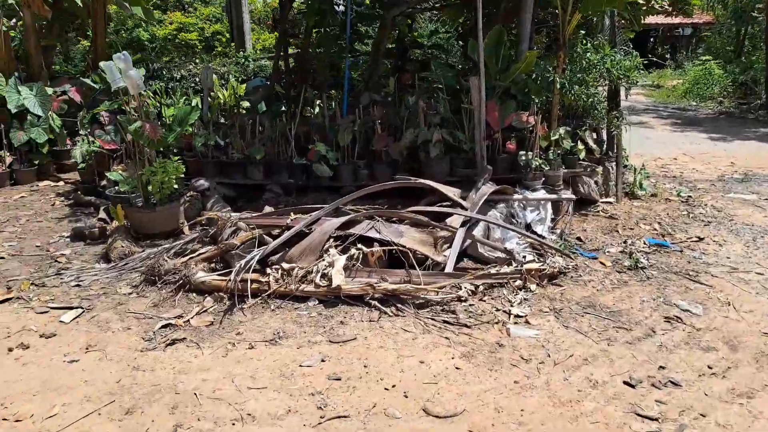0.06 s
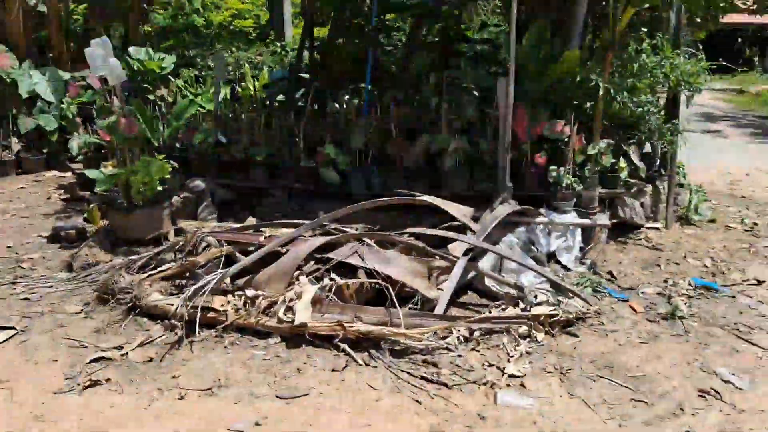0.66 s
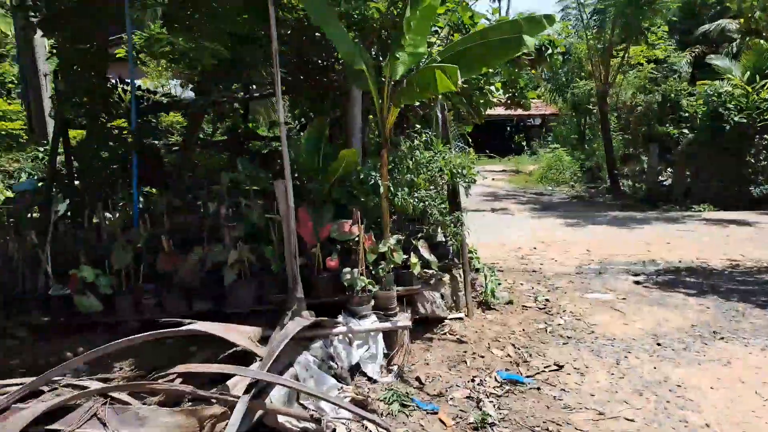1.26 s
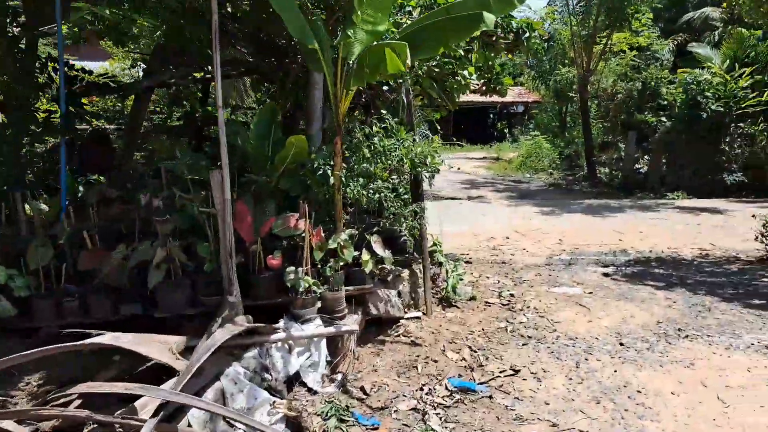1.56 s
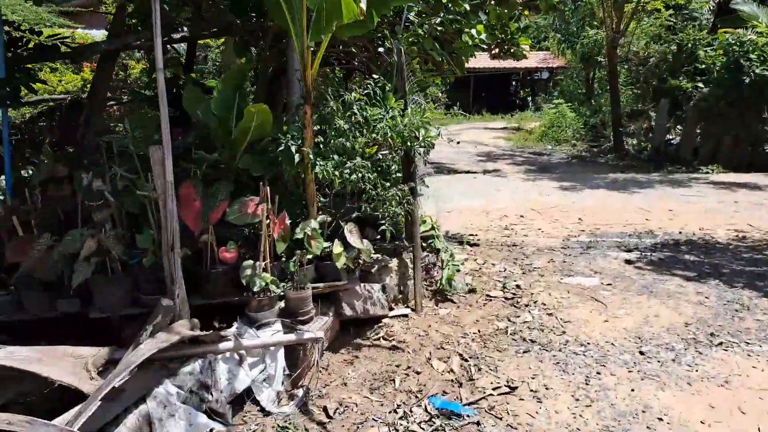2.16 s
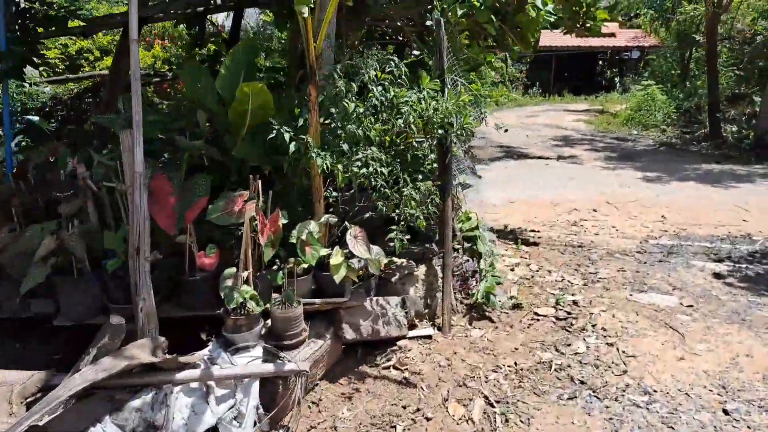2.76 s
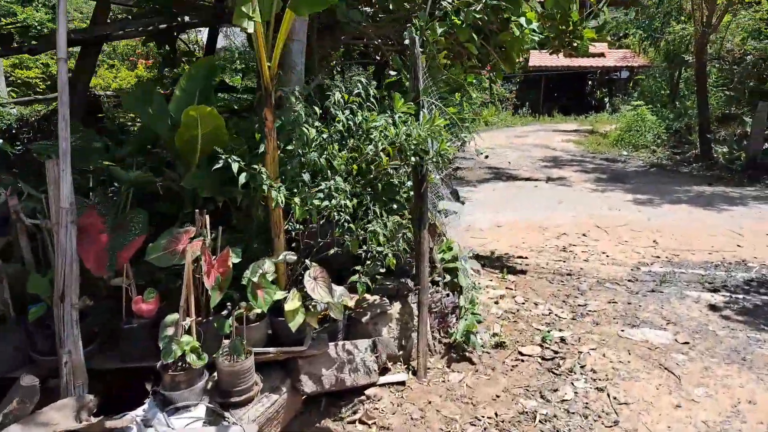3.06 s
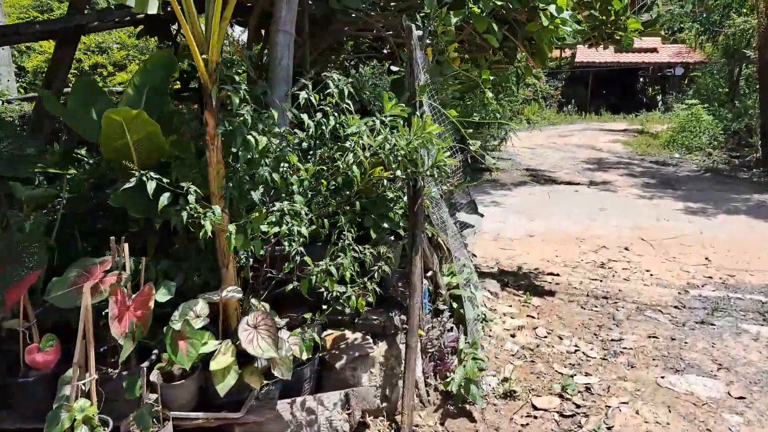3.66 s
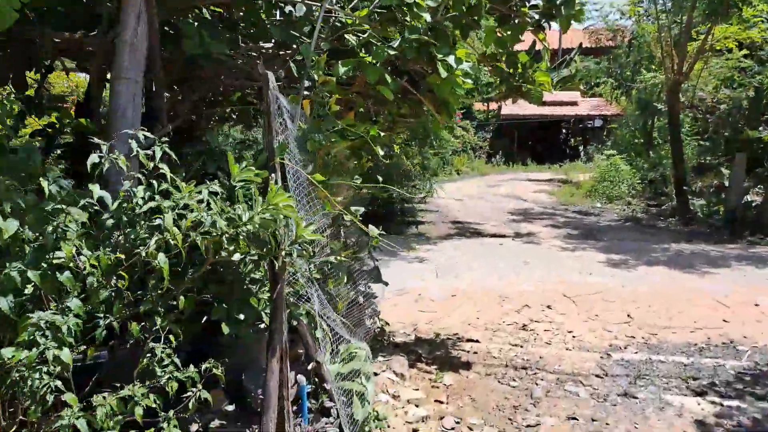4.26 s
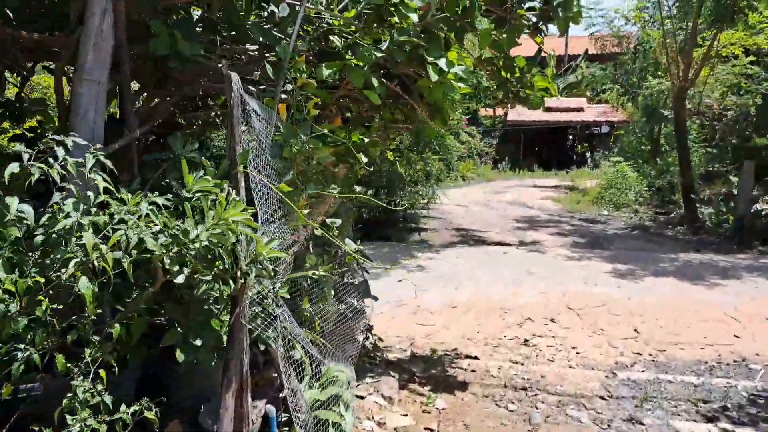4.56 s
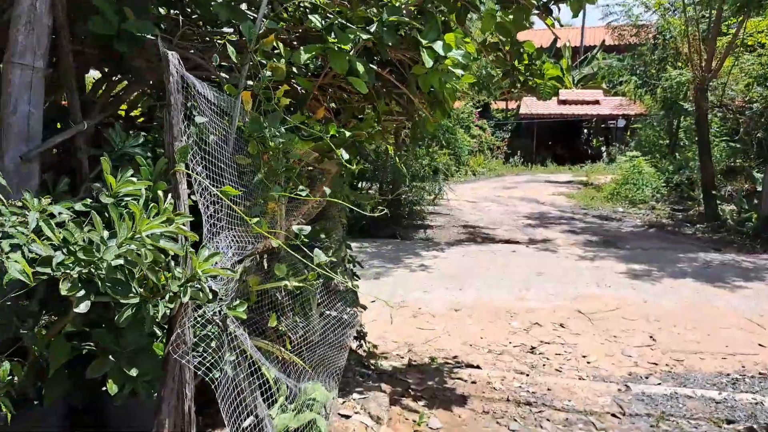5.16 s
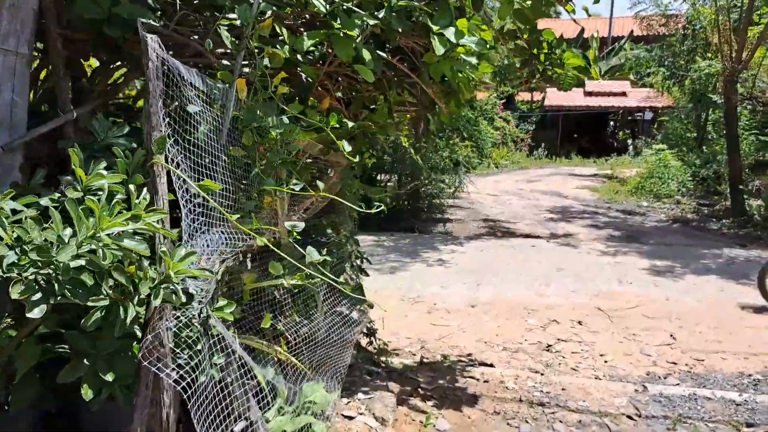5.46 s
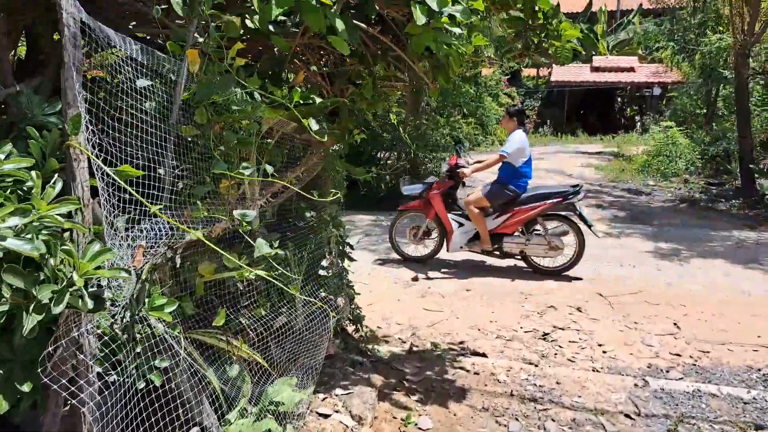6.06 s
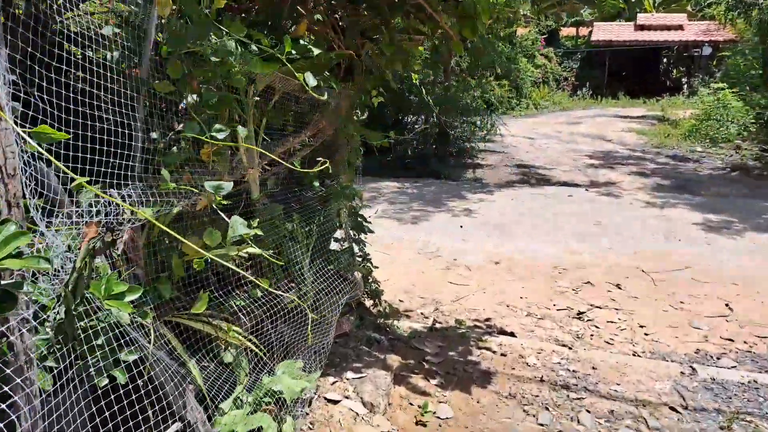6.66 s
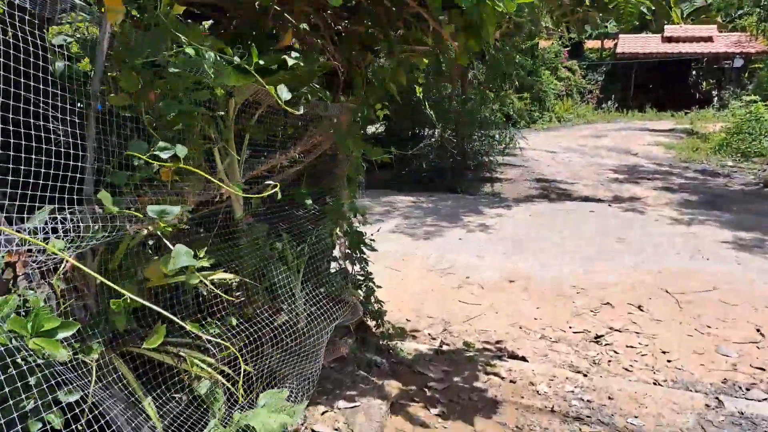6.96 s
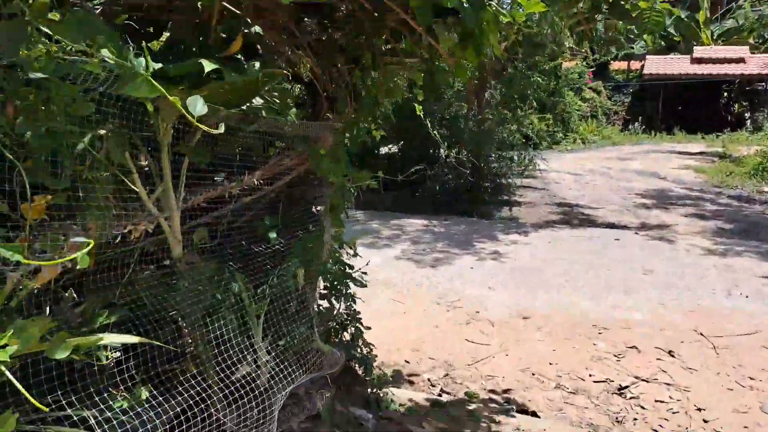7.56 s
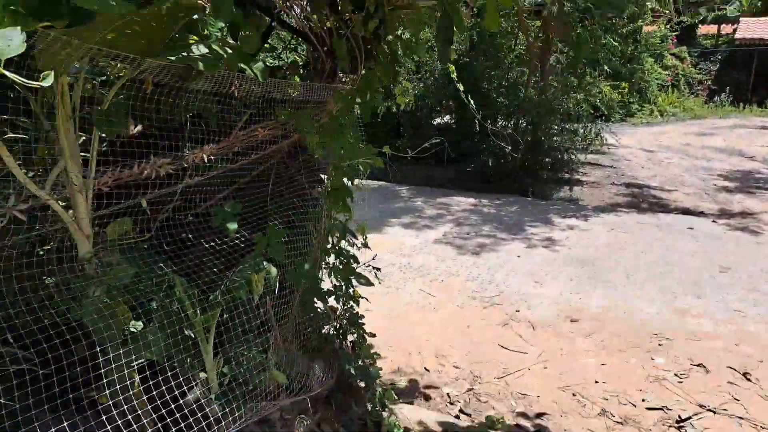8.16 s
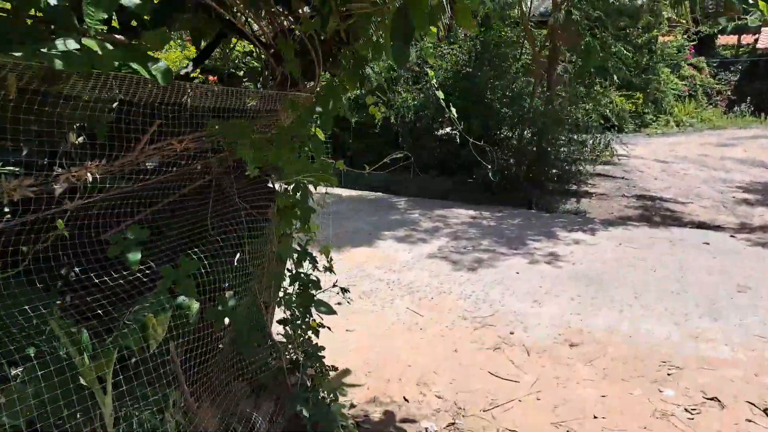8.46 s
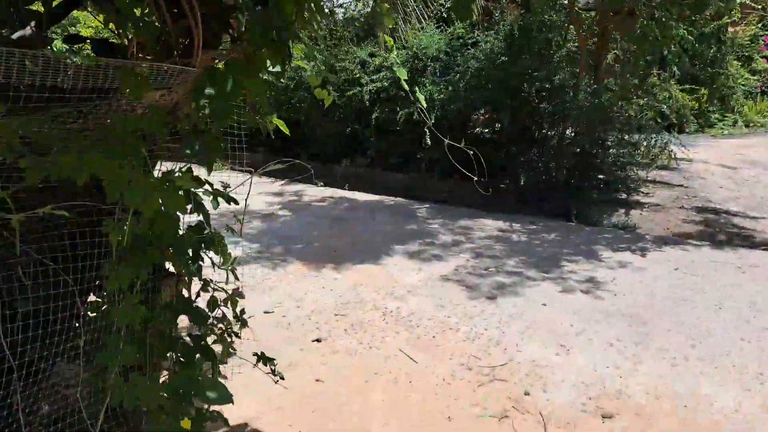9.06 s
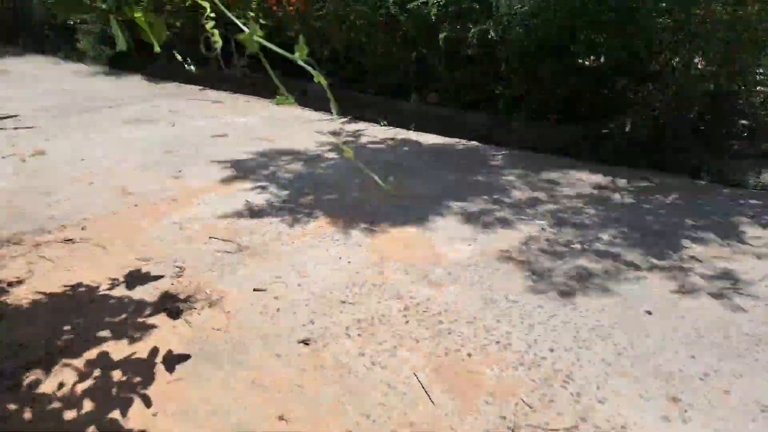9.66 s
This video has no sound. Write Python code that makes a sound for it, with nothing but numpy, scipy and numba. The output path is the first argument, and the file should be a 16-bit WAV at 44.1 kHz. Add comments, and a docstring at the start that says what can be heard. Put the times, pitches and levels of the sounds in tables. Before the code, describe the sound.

A small motorcycle putters closer, passes right to left and drops to idle, while footsteps scuff dry dirt and faint birds call.

```python
"""A small four-stroke motorcycle putters up a village lane, passes right to left, shuts its throttle
and idles on. Each firing rings the silencer, each intake stroke the air box; chain, valves and tyres
rattle and hiss as it comes close. Nearby, someone walks over dry dirt: soles scuff and thud, grit and
dead leaves tick. Faint birds call in the trees over a low breeze."""
import sys
import numpy as np
from scipy import signal
from scipy.fft import rfft, irfft
from scipy.io import wavfile
from scipy.ndimage import uniform_filter1d
from numba import njit

SR = 44100
rng = np.random.default_rng(int(sys.argv[2]) if len(sys.argv) > 2 else 0)


def file_out(sig):
    """Save sig as 16-bit WAV at sys.argv[1]."""
    # one column per channel
    cols = np.atleast_2d(sig).T
    # limit, then scale
    lim = np.clip(cols, -1, 1)
    pcm = np.round(lim * 32767).astype(np.int16)
    wavfile.write(sys.argv[1], SR, pcm)


N = 436149

# Idle, long pull, idle: (time [s], firing rate [Hz])
FIRING_RATE = [(0, 19.9), (.55, 20.3), (.75, 22.4), (1.0, 22.8), (1.25, 19.6), (1.5, 19.0), (2.0, 19.6),
               (2.45, 19.8), (2.9, 19.65), (4.34, 22.45), (5.23, 23.75), (5.85, 24.35), (6.37, 24.45),
               (7.14, 24.8), (7.24, 22.7), (7.48, 18.4), (7.6, 18.9), (7.84, 18.65), (8.75, 18.8),
               (9.89, 18.5)]
SHUT_S = 7.201  # throttle closes

def motorcycle(port_lag_s=0.00035):
    """Engine and running gear, locked to one cycle; the nearer channel leads."""
    cycles = np.cumsum(curves(FIRING_RATE)[0] * (1 + .006 * drift(20))) / SR
    cycles -= cycles[int(SHUT_S * SR)]  # throttle shuts on a beat
    low_notes = engine(cycles)
    clatter = casing_clatter(cycles)
    metal = waver(casing_ring() + chain(), share=.008, rate_hz=9)
    gear = clatter + metal + tyres() + valves(cycles) + stones()
    left, right = low_notes + pan(-3.0) * gear
    _, bearing = position()
    i, lag = np.arange(N), np.round(bearing * port_lag_s * SR)
    return np.array([np.interp(i - lag, i, left), right])


def engine(cycles):
    """Intake and exhaust pulses; the baffles pass only the low notes."""
    beats = unit(strokes(cycles, scatter_db=1.4))
    sound = air_box(cycles) + silencer(beats, cycles) + thumps(beats)
    return signal.sosfilt(signal.butter(8, 250, fs=SR, output="sos"), sound)


def strokes(cycles, scatter_db):
    """One impulse per cycle, of nearly equal strength."""
    count = np.floor(cycles).astype(int)
    return (np.diff(count, prepend=count[0]) > 0) * undb(scatter_db * rng.standard_normal(N)[count])


# Main resonance, following gas heat and flow: (time [s], frequency [Hz])
SILENCER_PITCH = [(0, 107), (2.4, 115), (3.2, 117), (3.7, 107), (4.5, 118.6), (6, 125.2), (7.13, 128),
                  (7.25, 97), (7.48, 96), (7.62, 102), (9.89, 107.3)]
# Main resonance: (time [s], level [dB])
SILENCER_LEVEL = [(0, -41), (0.68, -42.5), (0.86, -37), (1.1, -43), (1.5, -44), (1.66, -36.5),
                  (2.04, -48.5), (2.34, -33), (2.7, -40.5), (2.92, -35), (3.04, -40), (3.22, -34),
                  (3.48, -38.5), (3.65, -35), (4.05, -33), (4.18, -39), (4.42, -35.5), (4.58, -29.5),
                  (4.8, -32), (5.4, -32.5), (5.7, -29), (6.32, -25.5), (6.72, -31.5), (7.12, -32),
                  (7.25, -23.5), (7.55, -28.5), (7.7, -27.5), (8.04, -27.5), (8.24, -33.5), (8.45, -28.5),
                  (8.76, -34.5), (8.92, -29.5), (9.88, -32)]
# Upper resonances: (ratio to main [1], width [Hz], gain [dB])
UPPER_MODES = [(1.5, 67, 7), (2.0, 49, -3.5)]
# Upper resonances: (time [s], level [dB])
UPPER_LEVEL = [(0, -46), (1.5, -51), (3.0, -41), (4.5, -36.5), (6.2, -37.5), (7.1, -43), (7.5, -40.5),
               (7.75, -45.5), (8.4, -38.5), (9.0, -44), (9.89, -48)]

def silencer(beats, cycles, pipe_width_hz=19.8, outlet_width_hz=85.0):
    """Each beat and its turbulent puff of gas ring the silencer."""
    pipe_hz = curves(SILENCER_PITCH)[0]
    puffs = unit(np.exp(-2 * (cycles % 1)) * rng.standard_normal(N))
    gas = beats + .13 * puffs
    main = sweep(sweep(gas, pipe_hz, pipe_width_hz), pipe_hz, outlet_width_hz)
    upper = np.zeros(N)
    for ratio, width, db in UPPER_MODES:
        hz = ratio * pipe_hz
        upper += undb(db) * sweep(sweep(gas, hz, float(width)), hz, float(width))
    return unit(main) * undb(curves(SILENCER_LEVEL)[0]) + unit(upper) * undb(curves(UPPER_LEVEL)[0])


def air_box(cycles, lag_cycles=0.269, full_speed_hz=24.1, fade_db_per_hz=5):
    """Intake gulps ring the air box; the boom fades as the firings slow."""
    gulps = strokes(cycles - lag_cycles, scatter_db=.7)
    boom = steep_ring(gulps, hz=50., width_hz=28.)
    fade_db = fade_db_per_hz * np.maximum(full_speed_hz - curves(FIRING_RATE)[0], 0)
    return unit(boom) * undb(pass_db(-34.5, doubling_db=0.89, ahead_db=-0.6) - fade_db)


def thumps(beats, overrun_s=.315, sag_db_per_s=16):
    """Throttle shut: rounded beats thump deeply, then settle to an idle."""
    rounded = signal.sosfilt(signal.butter(3, 150, fs=SR, output="sos"), beats)
    thump = steep_ring(rounded, hz=80., width_hz=78.)
    sag_db = sag_db_per_s * np.maximum(np.arange(N) / SR - SHUT_S, 0)
    overrun = undb(-22 - sag_db) * envelope(SHUT_S, overrun_s, attack_s=0.0039, release_s=.02)
    idle = undb(-37.5) * envelope(SHUT_S, N / SR, attack_s=0.34, release_s=1)
    return unit(thump) * np.maximum(overrun, idle)


# Casing response: (frequency [Hz], gain [dB])
CASING_SPECTRUM = [(150, -28), (250, 0), (311, 0), (436, -2.5), (640, -0.5), (735, -3), (838, -10.5),
                   (922, -2.5), (1040, -3), (1140, -7.5), (1230, -2), (1400, -7.5), (2000, -24.5),
                   (2600, -9.5), (4400, -120)]

def casing_clatter(cycles):
    """Piston and gears repeat their blows every cycle, amid loose rattle."""
    pattern = rng.standard_normal(SR // 40)
    repeating = np.interp(cycles % 1, np.linspace(0, 1, len(pattern)), pattern)
    blows = .5 * repeating + grains(spread_db=2.5, likeness=.7)
    level_db = pass_db(-35.5, doubling_db=7.42, ahead_db=0.34) + 0.86 * drift(14)
    return unit(colour(blows, CASING_SPECTRUM)) * undb(level_db)


# Crankcase and covers: (frequency [Hz], width [Hz], gain [dB])
CASING_MODES = [(363, 15, 0.5), (434, 50, -2.5), (550, 71, -5), (839, 76, 3.5), (1020, 81, -2.5),
                (1080, 30, -7), (1240, 91, -7)]
# Crankcase ringing: (time [s], level [dB])
CASING_LEVEL = [(2.0, -69), (4.0, -56), (5.1, -45.5), (5.55, -38.5), (6.25, -35.5), (6.6, -41.5),
                (7.2, -50), (8.0, -81)]

def casing_ring():
    """Crankcase resonances, carrying while the engine's side is in view."""
    return rings(grains(spread_db=0.0, likeness=1.0), CASING_MODES) * undb(curves(CASING_LEVEL)[0])


# Chain resonances: (frequency [Hz], width [Hz], gain [dB])
CHAIN_MODES = [(1990, 490, 5.5), (2850, 170, 7.5), (5220, 150, -28.5), (6700, 540, -5)]

def chain():
    """Dense roller impacts ring the chain into a whirr."""
    rollers = grains(spread_db=-1.0, likeness=0.024)
    whirr = sum(undb(db) * ring(rollers, hz, width) for hz, width, db in CHAIN_MODES)
    return unit(whirr) * undb(pass_db(-39, doubling_db=8.8, ahead_db=-0.34))


# Tyre hiss: (frequency [Hz], gain [dB])
TYRE_SPECTRUM = [(820, -28.5), (1400, 3.5), (2580, 0), (2950, -1.5), (3230, 0), (4250, 0), (4960, 0),
                 (6260, -3.5), (7760, -2), (9130, -11), (10100, -6.5), (12800, -7), (16000, -18)]

def tyres():
    """Tyres hiss on the lane; leaves and distance take off the top."""
    level_db = pass_db(-33.5, doubling_db=7.13, ahead_db=2.7)
    hiss = colour(grains(spread_db=2.0, likeness=0.085), TYRE_SPECTRUM)
    hiss *= undb(level_db + 1.16 * drift(25))
    dull = signal.lfilter(*signal.butter(1, 5000, fs=SR), hiss)
    nearness = undb(0.42 * (level_db - level_db.max()))
    return dull + nearness * (hiss - dull)


# Valve covers: (frequency [Hz], width [Hz], gain [dB])
COVER_MODES = [(1920, 130, -4), (2310, 500, 0.5), (2775, 310, 2), (5360, 910, -3.5)]
# Tappet: (frequency [Hz], width [Hz], gain [dB])
TAPPET_MODES = [(5300, 680, -5), (7970, 840, 6), (10700, 4100, -1.5), (13000, 2300, -5)]
# Valve rasp as the machine clears the bushes: (time [s], level [dB])
VALVE_LEVEL = [(3.6, -96), (4.3, -49.5), (4.9, -53.5), (5.07, -39.5), (5.15, -39.5), (5.26, -37.5),
               (5.5, -40), (6.1, -56), (6.8, -70)]

def valves(cycles, tappet_db=-2.5, lag_cycles=0.16):
    """Covers buzz in uneven bursts; a tappet ticks once per cycle."""
    phase = (cycles - lag_cycles) % 1
    buzz = grains(spread_db=1.8, likeness=.4) * (.5 + np.exp(-4 * phase)) * undb(1.8 * drift(30))
    taps = grains(spread_db=1, likeness=.3) * (.2 + np.exp(-11 * phase)) * undb(2 * drift(24))
    covers = waver(rings(buzz, COVER_MODES), share=.04, rate_hz=10)
    return (covers + undb(tappet_db) * rings(taps, TAPPET_MODES)) * undb(curves(VALVE_LEVEL)[0])


# Stones spat by the tyres: (time [s], length [s], centre [Hz], width [Hz], level [dB])
SPAT_STONES = [(5.226, 0.062, 2730, 900, -36.5), (5.775, .015, 9500, 5000, -37),
               (5.986, 0.038, 6700, 900, -34.5), (6.0, .05, 5300, 700, -39),
               (6.063, 0.022, 8500, 5000, -34), (6.196, .13, 1140, 500, -38),
               (6.255, 0.1, 4800, 1100, -37.5), (6.358, .018, 6500, 5000, -34),
               (6.427, .06, 2470, 900, -38.5)]

def stones():
    """The tyres crunch pebbles and spit them out in short, bright bursts."""
    out = np.zeros((2, N))
    for s, length, hz, width, db in SPAT_STONES:
        shake = rng.standard_normal((2, SR // 5))[:, :int(length * SR)]
        swell = np.sin(np.pi * np.linspace(0, 1, shake.shape[1]) ** .65)
        add(out, s, unit(steep_ring(shake, hz, width)) * swell * undb(db))
    return out


# Ride along the lane: (time [s], offset to the right [m])
LANE_ROUTE = [(0, 36), (2.0, 39), (2.8, 27), (4.0, 14.5), (5.2, 8), (6.15, 0.5), (7.0, -7.5), (7.6, -12.5),
              (9.89, -11.5)]
NEAREST_M = 5.38

def position():
    """Motorcycle distance [m] and bearing (1 right, -1 left)."""
    along_m = curves(LANE_ROUTE)[0]
    distance_m = np.hypot(along_m, NEAREST_M)
    return distance_m, along_m / distance_m


def pass_db(nearest_db, doubling_db, ahead_db):
    """Level of one part: a loss per doubling of distance, a gain when heard from ahead."""
    distance_m, bearing = position()
    return nearest_db - doubling_db * np.log2(distance_m / NEAREST_M) + ahead_db * bearing


# Sole drags: (time [s], length [s], weight [dB], scrape [dB], grit [dB])
DRAGS = [(0.24, 0.12, -48, -53, -46), (0.384, 0.25, -47.5, -60, -47.5), (0.51, 0.083, -37.5, -44.5, -38.5),
         (0.622, 0.14, -40, -49.5, -40), (0.81, 0.029, -39.5, -48, -41.5), (0.93, 0.042, -46, -46.5, -48),
         (9.092, 0.43, -39.5, -38, -41.5), (9.318, 0.047, -31.5, -29, -35.5),
         (9.41, 0.056, -33.5, -34.5, -37), (9.492, 0.059, -36.5, -37, -38.5),
         (9.622, 0.093, -31, -35.5, -34.5), (9.735, 0.085, -36.5, -37, -35),
         (9.806, 0.063, -37.5, -37, -38)]
# Ground rumble, scrape, crushed grit: (frequency [Hz], gain [dB])
GROUND_SPECTRUM = [(45, -17), (100, -5), (170, -0.5), (220, -13.5), (303, -4), (349, -3.5), (561, -3),
                   (685, -9), (1000, -17.5), (1300, -43), (2200, -120)]
SCRAPE_SPECTRUM = [(530, -49), (900, -6), (1040, 2.5), (1180, 6.5), (1360, 12), (1480, 6), (1620, 8.5),
                   (1850, 6), (3000, -6), (3900, -51), (6600, -120)]
GRIT_SPECTRUM = [(1470, -19), (2500, -0.5), (2640, -5), (2810, -1), (7470, -9), (8600, -16.5),
                 (9960, -19.5), (12300, -9), (15200, -15), (16000, -32)]

def shuffles(attack_share=0.24, crunch_db=2.0):
    """A dragged sole rumbles on the ground, scrapes sand and crushes grit unevenly."""
    gains = np.zeros((3, N))
    for s, length, *levels_db in DRAGS:
        pressure = envelope(s, length, attack_s=attack_share * length, release_s=0.058)
        gains = np.maximum(gains, np.outer(undb(levels_db), pressure))
    weight, scrape, grit = gains
    crunch = undb(crunch_db * drift(55))
    clods = grains(spread_db=2.2, likeness=0.65) * undb(1.6 * drift(60))
    return (weight * colour(clods, GROUND_SPECTRUM)
            + scrape * np.sqrt(crunch) * colour(grains(spread_db=2.5, likeness=0.076), SCRAPE_SPECTRUM)
            + grit * crunch * colour(grains(spread_db=2.5, likeness=0.067), GRIT_SPECTRUM))


# Scuffs: (time [s], length [s], level [dB], relative grit [dB], relative sand [dB])
SANDAL_SCUFFS = [(0.143, 0.021, -43, -10, -21), (0.274, 0.026, -40, -23, -4),
                 (1.265, 0.029, -29.5, -18, -23), (1.288, 0.044, -43, -4, -12),
                 (2.412, 0.023, -35.5, -5, -3), (2.423, 0.044, -41, -8, -16), (2.842, 0.09, -41, -1.5, 3),
                 (3.829, 0.056, -38, -8, 2.5), (4.739, 0.072, -35, -9.5, 0.5),
                 (6.717, 0.056, -34.5, -7, -14), (7.325, 0.085, -44.5, -3, -10),
                 (8.339, 0.092, -35, -2.5, -6)]
# Sole rub, sliding sand, snapping grit: (frequency [Hz], gain [dB])
SOLE_SPECTRUM = [(280, -4), (390, 0), (560, -1.5), (1000, -4), (1700, 1), (2450, -4.5), (3500, -12.5),
                 (7000, -27)]
SAND_SPECTRUM = [(1500, -8), (2400, 6), (3100, 0), (4200, -5.5), (5300, -3.5), (8000, -22)]
SNAP_SPECTRUM = [(2500, -8.5), (5000, 14), (7500, 10), (9500, 3.5), (12500, 13.5), (16000, 1.5)]

def scuffs():
    """A sandal bites quickly, slides over sand and throws up grit."""
    rub, grit, sand = np.zeros((3, N))
    for s, length, db, grit_db, sand_db in SANDAL_SCUFFS:
        push = np.sin(np.pi * np.linspace(0, 1, int(length * SR)) ** 0.75) * undb(db)
        add(rub, s, push)
        add(grit, s, push * undb(grit_db))
        add(sand, s, push * undb(sand_db))
    crumbs = grains(spread_db=0.5, likeness=0.072)
    sole = colour(grains(spread_db=-5.0, likeness=0.8), SOLE_SPECTRUM)
    return rub * sole + grit * colour(crumbs, SNAP_SPECTRUM) + sand * colour(crumbs, SAND_SPECTRUM)


# Foot knocks: (time [s], peak [dB], pitch [Hz])
FOOT_KNOCKS = [(0.326, -26, 275), (0.347, -26, 384), (0.654, -24, 467), (0.709, -32, 425),
               (0.979, -32.5, 530), (1.299, -32, 395), (2.338, -39, 369), (2.423, -27.5, 365),
               (2.455, -33, 350), (2.98, -32.5, 413), (3.202, -38, 355), (3.749, -32, 452),
               (8.189, -28, 340), (8.458, -31.5, 550), (8.775, -31.5, 400), (9.034, -30, 400),
               (9.145, -30, 541), (9.344, -22, 567), (9.376, -23.5, 840), (9.382, -20, 450),
               (9.443, -22, 312), (9.548, -26, 590), (9.619, -19, 510), (9.649, -24, 510),
               (9.727, -18, 483), (9.757, -22, 466), (9.781, -33, 455), (9.802, -25, 550)]

def knocks(t60_s=0.084, width_hz=184.0, contact=16.7):
    """Heels and pebbles hit packed earth: one firm contact, then loose soil settles."""
    out, t = np.zeros((2, N)), np.arange(SR // 8) / SR
    for s, db, hz in FOOT_KNOCKS:
        push = contact * (t == 0) + rng.standard_normal(len(t)) * undb(-60 * t / t60_s)
        thud = ring(ring(push, hz, width_hz), hz, 2 * width_hz)
        add(out, s, thud / np.abs(thud).max() * undb(db))
    return out


# Cracks underfoot: (time [s], level [dB], relative body [dB], rise [s])
CRACKS = [(0.17, -47, -18, .0015), (0.262, -40, -1, .001), (0.298, -28, -4, 0.0008),
          (0.3134, -32.5, -4, 0.0018), (0.419, -41, -19, .0015), (0.4802, -32, -5, 0.0014),
          (0.802, -33, -6, 0.00088), (1.103, -43.5, -8, .001), (1.2383, -32, -6, 0.0012),
          (1.2744, -31, -14, .0015), (1.282, -35, -16, .0015), (1.6047, -34.5, -2.5, 0.0014),
          (1.6183, -29.5, -1, 0.00079), (1.798, -43, 2, 0.0013), (2.4196, -30, 2.5, .0015),
          (3.5677, -38.5, -17, .001), (3.928, -31, -10, .0008), (3.9726, -27, -14, 0.00063),
          (6.5676, -34, -9, .001), (7.722, -29.5, -1, .0006), (8.971, -34, 0.5, 0.00099),
          (9.1296, -36, -15, .001), (9.7315, -23, -4, .0005)]

def ticks(crumb_count=8, crumbs_until_s=4.0):
    """Grit and dead leaves snap within milliseconds; fainter crumbs crack at random."""
    snap, body = np.zeros((2, N))
    t = np.arange(SR // 20) / SR
    crack = lambda rise_s: t / rise_s * np.exp(1 - t / rise_s)
    for s, db, body_db, rise_s in CRACKS:
        add(snap, s, crack(rise_s) * undb(db))
        add(body, s, crack(rise_s) * undb(db + body_db))
    for when, size in rng.random((crumb_count, 2)):
        add(snap, when * crumbs_until_s, crack(rise_s=0.0026) * undb(-53 + 9 * size))
    fracture = grains(spread_db=1.5, likeness=.3)
    return snap * colour(fracture, SNAP_SPECTRUM) + body * colour(fracture, SOLE_SPECTRUM)


# Leaf brushes: (time [s], length [s], level [dB])
BRUSHES = [(8.047, 0.059, -50), (8.14, .025, -51)]

def leaf():
    """A leaf brushes past with a fine, very high rustle."""
    brush = sum(undb(db) * envelope(s, length, attack_s=.02, release_s=.012) for s, length, db in BRUSHES)
    return colour(grains(spread_db=2.5, likeness=.2), [(7000, -12), (12000, -1), (15000, -3)]) * brush


# Calls: (time [s], length [s], pitch [Hz], level [dB], quiver [share of pitch])
BIRD_CALLS = [(1.58, 0.11, 5090, -53.5, .026), (1.70, 0.065, 4560, -52.5, .06),
              (2.48, 0.2, 6763, -57.5, .022), (3.13, 0.29, 6750, -60.5, .026),
              (7.26, 0.072, 5050, -50, .035), (7.38, 0.086, 4770, -52, .04)]

def birds():
    """Thin, quivering whistles blurred by foliage."""
    out = np.zeros((2, N))
    quiver = np.array([drift(900), drift(900)])
    for s, length, hz, db, share in BIRD_CALLS:
        i = int(s * SR) + np.arange(int(length * SR))
        phase = 2 * np.pi * np.cumsum(hz * (1 + share * quiver[:, i]), axis=1) / SR
        add(out, s, np.sin(phase) * signal.windows.tukey(len(i), .8) * undb(db))
    return garden(out, t60_s=0.5, wet_db=3)


# Outdoor hush: (frequency [Hz], gain [dB])
HUSH_SPECTRUM = [(190, -39), (330, -2), (464, -3), (583, -1), (1050, -11), (1910, -8.5), (3100, -32),
                 (5570, -30), (7700, -20), (8770, -56), (12500, -18.5), (16000, -28)]
# Breeze rumble: (time [s], level [dB])
BREEZE_LEVEL = [(0, -44), (.7, -41), (1.2, -37), (1.7, -41), (2.4, -40.5), (3.1, -37.5), (3.9, -43.5),
                (7.6, -46), (8.9, -50), (9.7, -35.5)]

def air():
    """Faint hush over the restless rumble of a breeze."""
    hush = colour(grains(spread_db=4.0, likeness=0.34), HUSH_SPECTRUM) * undb(-53.5 + 1.68 * drift(2.69))
    eddies = grains(spread_db=2.5, likeness=0.43)
    rumble = colour(eddies, [(22, -5.0), (45, 3.0), (75, 3.0), (140, -2.5), (280, -10.5)])
    return hush + rumble * undb(curves(BREEZE_LEVEL)[0])


def garden(x, t60_s=0.41, wet_db=-14):
    """Walls and plants scatter a short, dull tail."""
    t = np.arange(SR // 2) / SR
    scatter = signal.lfilter(*signal.butter(1, 3500, fs=SR), rng.standard_normal((2, len(t))))
    tail = signal.lfilter(*signal.butter(2, 300, "high", fs=SR), scatter * undb(-60 * t / t60_s))
    return x + undb(wet_db) * signal.oaconvolve(x, tail / np.linalg.norm(tail[0]), axes=1)[:, :N]


def undb(db):
    """Decibels to gain."""
    return 10 ** (np.asarray(db) / 20)


def unit(x):
    """Scale to rms 1."""
    return x / np.sqrt(np.mean(x ** 2))


def pan(db):
    """Stereo gains; positive is left."""
    return undb(np.array([[db], [-db]]) / 2)


def add(track, s, sound):
    """Mix a sound into a track at time s."""
    start = int(s * SR)
    track[..., start:start + sound.shape[-1]] += sound[..., :N - start]


def curves(table):
    """Table columns, linearly interpolated in time."""
    s, *columns = np.transpose(table)
    return [np.interp(np.arange(N) / SR, s, c) for c in columns]


def envelope(s, length_s, attack_s, release_s):
    """Linear rise from time s, hold, exponential release."""
    age = np.arange(N) / SR - s
    return np.clip(age / attack_s, 0, 1) * np.exp(-np.maximum(age - length_s, 0) / release_s)


def drift(rate_hz):
    """Random steps, smoothed twice, rms 1."""
    hold = int(SR / rate_hz)
    steps = np.repeat(rng.standard_normal(N // hold + 1), hold)
    return unit(uniform_filter1d(uniform_filter1d(steps, hold), hold)[:N])


def grains(spread_db, likeness):
    """Dense tiny impacts of uneven size; likeness is the left-right correlation."""
    sizes = np.repeat(rng.exponential(size=N // 32 + 1), 32)[:N]
    gain = unit(undb(spread_db * np.minimum(sizes, 6)))
    noise = rng.standard_normal((3, N))
    return gain * (np.sqrt(likeness) * noise[0] + np.sqrt(1 - likeness) * noise[1:])


def ring(x, hz, width_hz):
    """One resonance, gain 1 at its centre."""
    return signal.lfilter(*signal.iirpeak(hz, hz / width_hz, fs=SR), x)


def steep_ring(x, hz, width_hz):
    """The same resonance twice in series."""
    return ring(ring(x, hz, width_hz), hz, width_hz)


def rings(x, modes):
    """Steep resonances in parallel, rms 1."""
    return unit(sum(undb(db) * steep_ring(x, hz, width) for hz, width, db in modes))


@njit
def sweep(x, hz, width_hz):
    """A resonance with a moving centre (state-variable filter)."""
    y, band, low = np.empty(len(x)), 0., 0.
    for i in range(len(x)):
        g, damping = np.tan(np.pi * hz[i] / SR), width_hz / hz[i]
        v = (band + g * (x[i] + 1e-18 - low)) / (1 + g * (g + damping))
        band, low, y[i] = 2 * v - band, low + 2 * g * v, damping * v
    return y


def waver(x, share, rate_hz):
    """Random pitch drift by a small share."""
    i = np.arange(N)
    place = (i + np.cumsum(share * drift(rate_hz))) % N
    return np.array([np.interp(place, i, channel) for channel in x])


def colour(x, spectrum, size=4096):
    """Minimum-phase filter through (Hz, dB) points; white noise keeps its power."""
    hz, db = np.transpose(spectrum)
    octave, known = np.log2(np.maximum(np.arange(size // 2 + 1) * SR / size, 1)), np.log2(hz)
    octaves_beyond = np.abs(octave - np.clip(octave, known[0], known[-1]))
    gain_db = np.maximum(np.interp(octave, known, db) - 30 * octaves_beyond, -90)
    cepstrum = irfft(np.log(undb(gain_db)))
    cepstrum[1:size // 2] *= 2
    cepstrum[size // 2 + 1:] = 0
    response = irfft(np.exp(rfft(cepstrum)))
    return signal.oaconvolve(x, response[None] / np.linalg.norm(response), axes=1)[:, :N]


def scene():
    """Motorcycle, feet slightly to the right, leaf, birds and air."""
    feet = pan(-4.0) * garden(shuffles() + scuffs() + knocks() + ticks())
    return motorcycle() + feet + leaf() + birds() + air()


def record(dry, bottom_hz=33, top_hz=16000):
    """Cut the deepest bass and the top."""
    thin = signal.sosfilt(signal.butter(4, bottom_hz, "high", fs=SR, output="sos"), dry)
    return signal.sosfilt(signal.ellip(8, .2, 70, top_hz, fs=SR, output="sos"), thin)


dry = scene()
out = record(dry)
file_out(out)
```